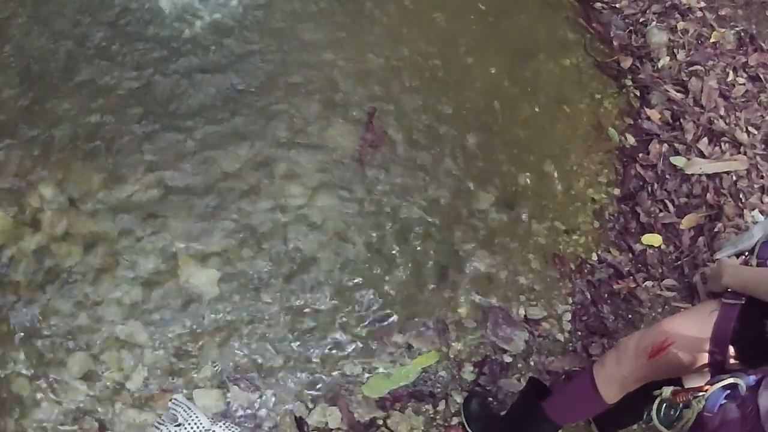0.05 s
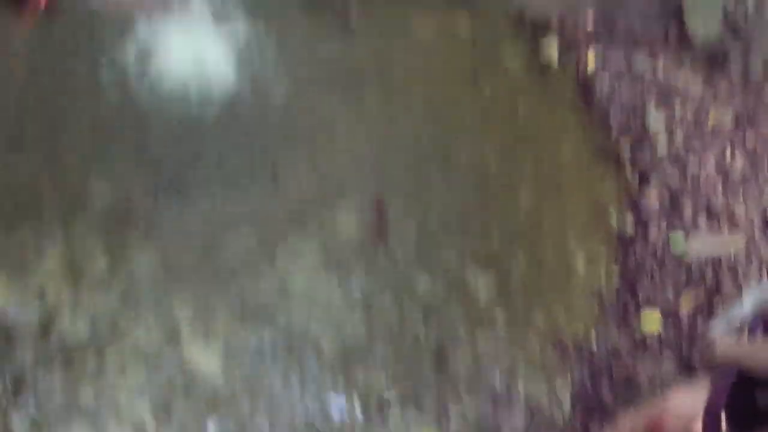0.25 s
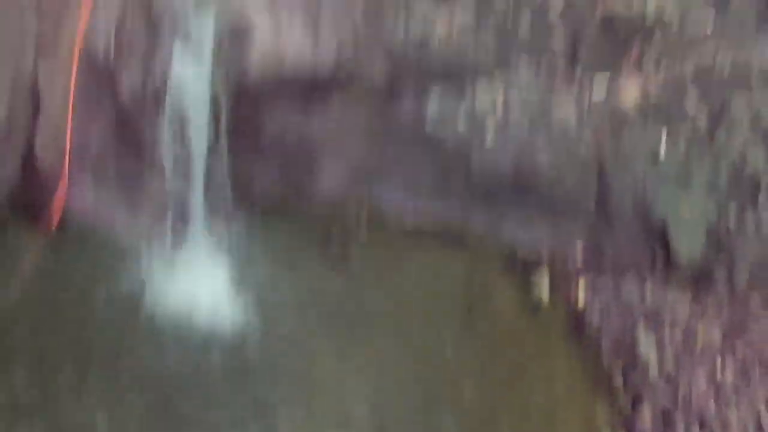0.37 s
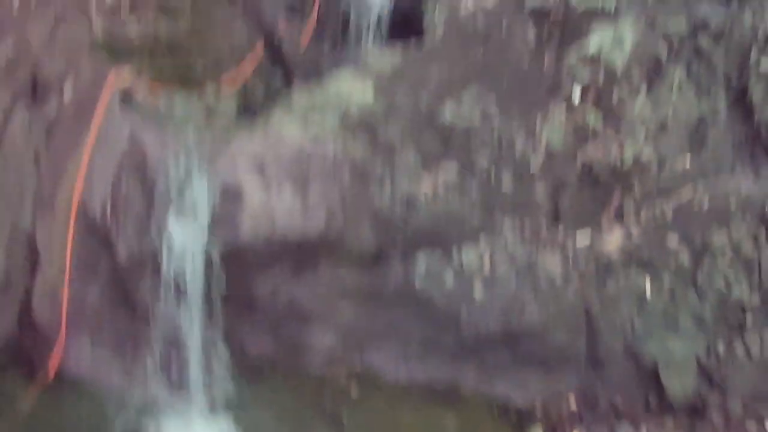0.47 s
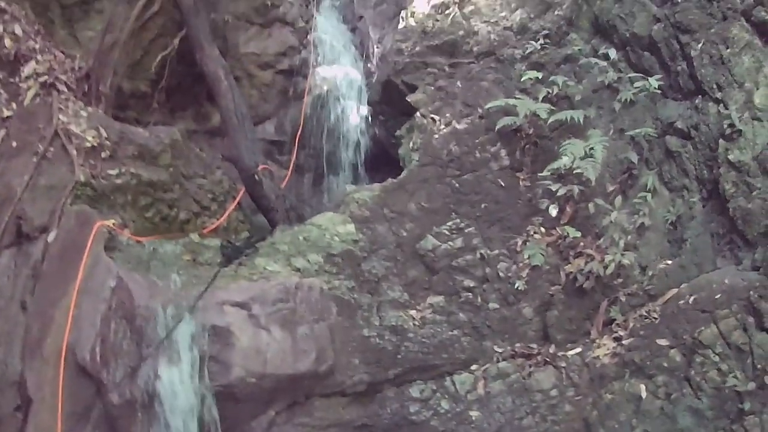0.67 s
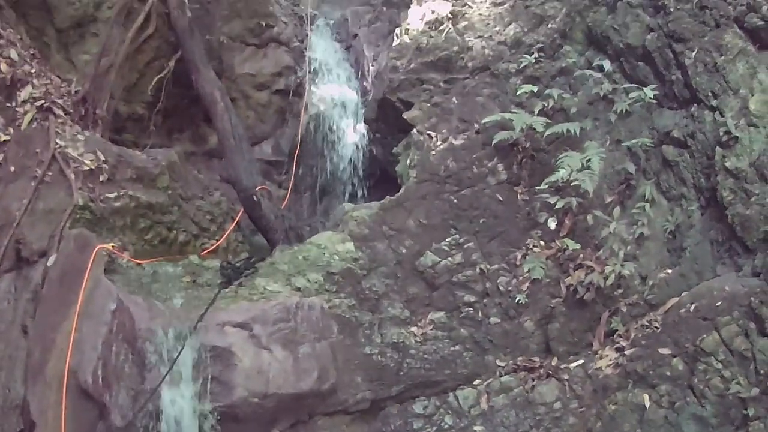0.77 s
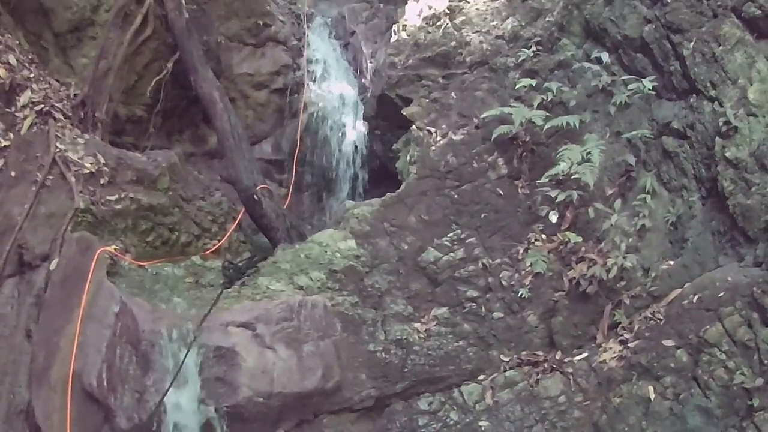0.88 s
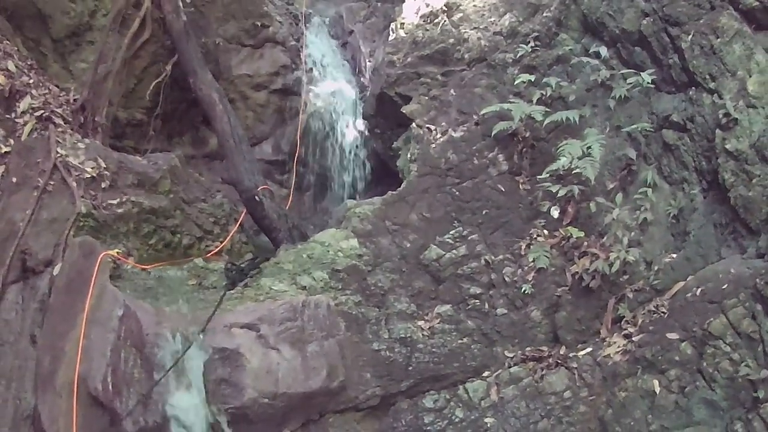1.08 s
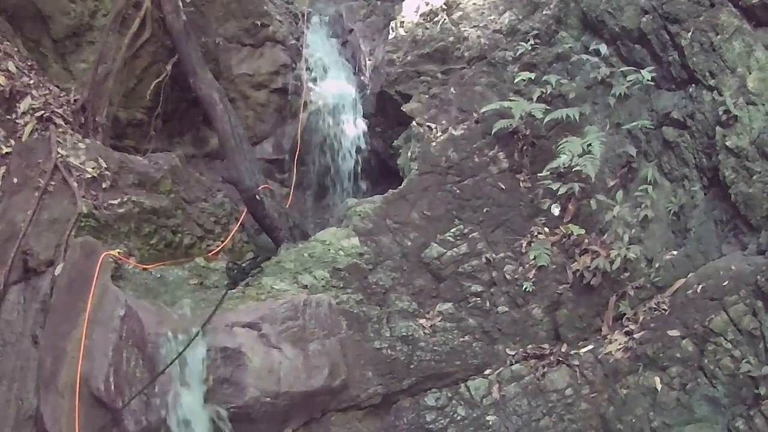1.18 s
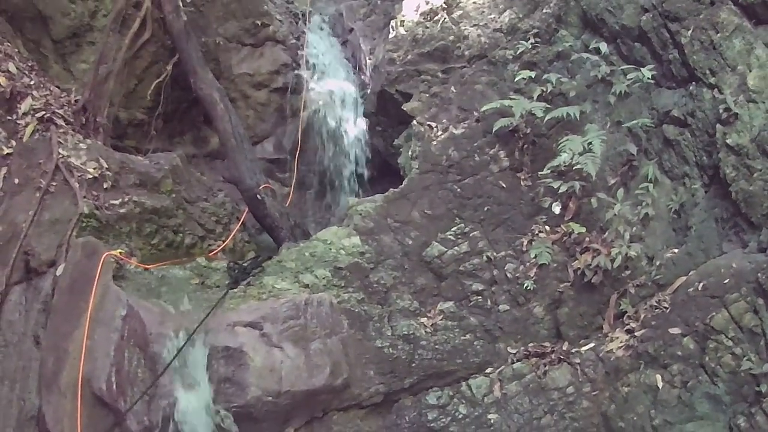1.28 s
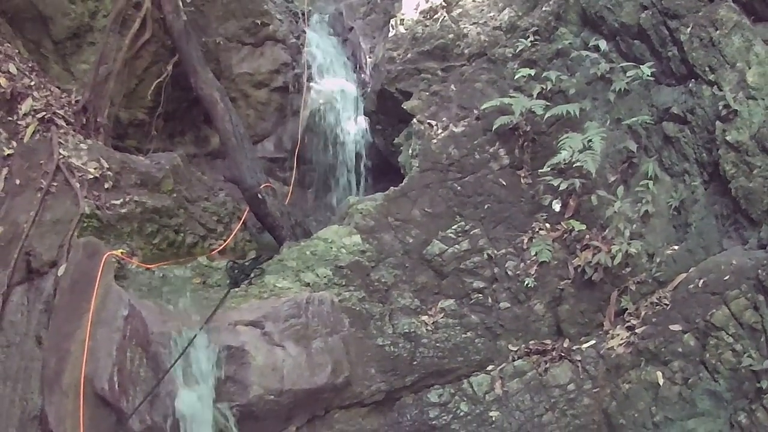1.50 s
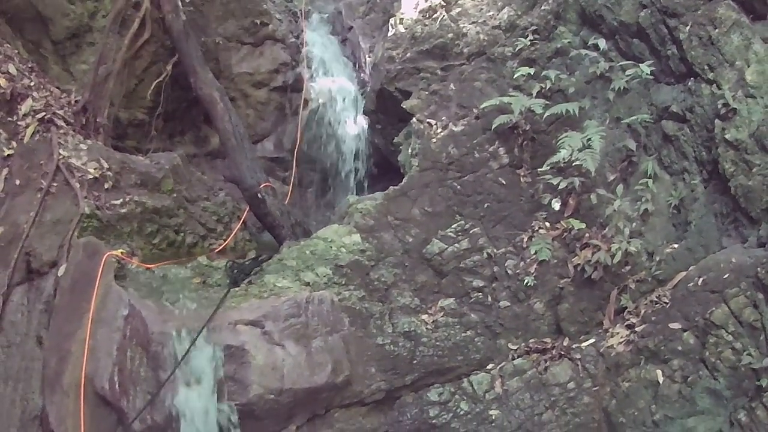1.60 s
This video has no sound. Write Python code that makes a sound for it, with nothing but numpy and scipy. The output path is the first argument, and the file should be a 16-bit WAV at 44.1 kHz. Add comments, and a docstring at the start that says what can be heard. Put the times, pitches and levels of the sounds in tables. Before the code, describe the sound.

Steady waterfall rush with fine splashing, a low microphone gust and soft handling bumps

```python
"""At a rock pool below a small waterfall, a body-worn camera's microphone hears the rush through its housing.
From the start, noise is the wash, ringing bubbles and bursts of spray the splashes; rock walls echo the wash.
Low noise is air on the microphone, with a deep gust as the camera swings up; sines that swell and fade
shudder the mount. As the swing stops the mount rubs, a low noise, and a slow damped push jolts the housing.
Light air and the fall carry on, and near the end the housing takes one soft, quicker bump."""
import sys
import numpy as np
from scipy import signal
from scipy.fft import rfft, irfft
from scipy.io import wavfile
from scipy.ndimage import uniform_filter1d

SR = 44100
rng = np.random.default_rng(int(sys.argv[2]) if len(sys.argv) > 2 else 0)


def digitize_waveform(pressure):
    """Quantize a signal to 16-bit integers and store it at the path in sys.argv[1].

    Rows of a 2-D input are taken as channels; values are limited to [-1, 1].
    """
    field = np.atleast_2d(pressure).T
    bounded = np.clip(field, -1, 1)
    quanta = np.round(bounded * 32767).astype(np.int16)
    wavfile.write(sys.argv[1], SR, quanta)


N = 72765  # samples

# Spectrum of the rush at the microphone, inside the housing: pitch_hz, relative level_db per Hz
RUSH_SPECTRUM = [(60, -0.5), (150, -10), (200, -11), (236, -7), (300, -11.5), (390, -10), (480, -13.5),
                 (680, -9.5), (860, -11), (1050, -3), (1170, -3.5), (1265, 2), (1340, -3), (1420, -9),
                 (1560, -12), (1870, -5), (2150, -11), (2560, -18.5), (2900, -32), (3150, -15), (3420, -13),
                 (3950, -22.5), (4200, -22), (5400, -23.5), (5750, -21.5), (6130, -18.5), (6500, -24),
                 (6850, -19.5), (7600, -27), (8400, -32.5), (8850, -42.5), (9800, -38), (10400, -46.5),
                 (11200, -39.5), (12200, -47), (15600, -46)]
# Narrow dips and peaks of the housing: pitch_hz, width_hz, level_db
HOUSING_NOTCHES = [(3020, 100, -3.5), (5140, 78, -2.5), (5430, 73, 1.5), (5820, 150, -8.5)]
# Rush as the camera turns from pool to fall: time_s, body_db (low part), spray_db (high part)
FACING_LEVELS = [(0, 2, 2.5), (.2, 2, 2.5), (.45, 0.8, 2.6), (.95, 0.5, 1.75), (1.08, -0.5, 2.5),
                 (1.3, -0.27, 2.5), (1.65, 0, 2)]
# Heavier splashes that stand out: start_s, level_db (swell peak, before band shaping; wash at 0), centre_hz
HEAVY_SPLASHES = [(.018, 3, 1350), (.399, 4, 1480), (0.495, 0, 1520), (0.581, -1, 1500), (0.839, 7.5, 1840),
                  (0.899, -8, 1300), (1.343, -5, 1520), (1.451, 3, 1210), (1.469, 6, 6500)]
# Air buffeting the microphone: time_s, level_db
BUFFET_LEVELS = [(0, -50), (.035, -49), (.08, -37), (.125, -45.5), (.165, -21), (.225, -21.5), (.26, -7.5),
                 (.34, -10), (.385, -14), (.415, -23.5), (.45, -22), (.52, -30), (.59, -19.5), (.65, -29.5),
                 (.70, -36), (.77, -27.5), (.95, -33), (1.2, -29), (1.3, -41.5), (1.385, -30),
                 (1.44, -35.5), (1.54, -34.5), (1.61, -35.5)]
# Spectrum of air in a strong gust: pitch_hz, relative level_db per Hz
GUST_SPECTRUM = [(1, -10.5), (6, -3), (12, -0.5), (22, -10), (36, -26.5), (50, -32.5), (65, -54),
                 (100, -55), (200, -88), (400, -110)]
# Spectrum of light air: pitch_hz, relative level_db per Hz
DRAUGHT_SPECTRUM = [(1, -9.5), (6, -8), (12, 2), (25, -11.5), (40, -19.5), (65, -28.5), (100, -37),
                    (200, -59), (400, -86)]
# Shudders of the camera on its mount: middle_s, peak_db, length_s
MOUNT_SHUDDERS = [(.185, -21, 0.073), (0.324, -15.5, 0.059)]
# Rubbing of the mount: time_s, level_db
RUB_LEVELS = [(.38, -57), (.43, -44.5), (.46, -44), (.495, -44.5), (.525, -45.5), (.56, -50), (.68, -63)]
# Spectrum of the rub: pitch_hz, relative level_db per Hz
RUB_SPECTRUM = [(25, -9), (50, 7), (100, -6.5), (175, 1), (260, -24.5), (380, -2.5), (520, -15.5),
                (1200, -47)]
# Bumps on the housing, the slow one a jolt as the swing ends: start_s, peak_db, rise_s
HOUSING_BUMPS = [(.568, -17.5, 0.019), (1.479, -24, 0.0029)]

RUSH_DB = -41  # before the facing levels
PATCH_DB, SWELL_DB, SPRAY_FLICKER_DB = 1, -0.54, 1.13  # size of each random drift; its sign is immaterial
SPRAY_HZ = 3400  # body gives way to spray here
ECHO_DB, ECHO_LAST_S = -22, .03  # level of each wall echo; the latest delay
BUBBLES_PER_S, BUBBLE_SIZES = 2200, 36  # the rate is shared among the sizes
BUBBLE_DB, BUBBLE_SPREAD_DB = -10, 1.5  # wash at 0
BUBBLE_Q, BUBBLE_RISE = 19.5, 0.031  # resonance quality; fractional pitch rise per decay time
SPLASHES_PER_S, SPLASH_S = 370, 0.00086  # burst time to its peak
SPLASH_DB, SPLASH_SPREAD_DB = -11, 4  # wash at 0, before the low-pass
SPLASH_TOP_HZ = 7100
HEAVY_RISE_S, HEAVY_OCTAVES = 0.0055, .8
DRAUGHT_MAX_DB = -29.5  # air above this level is gust
EVEN_S = 0.064  # half-width of the window that evens a rumble
MOUNT_HZ = 33.2
BUMP_SOFTNESS, BUMP_TURNS = 1.12, .1  # rounding of the onset; rebound in cycles per rise time
EDGE_HZ, FADE_S = 15750, .004


def gain_of(db):
    """Turns decibels into gain."""
    return 10 ** (np.asarray(db) / 20)


def evened(x):
    """Scales to rms 1."""
    return x / np.sqrt(np.mean(x ** 2) + 1e-20)


def curve(points):
    """Reads a time table at every sample."""
    return np.interp(np.arange(N) / SR, *np.transpose(points))


def filtered(x, gain):
    """Applies a gain to each frequency."""
    return irfft(rfft(x) * gain, N)


def coloured(x, points):
    """Filters by a spectrum table, read on a log-frequency axis, and scales to rms 1."""
    table_hz, level_db = np.transpose(points)
    hz = np.fft.rfftfreq(N, 1 / SR)
    return evened(filtered(x, gain_of(np.interp(np.log(hz + 1), np.log(table_hz + 1), level_db))))


def rumble(points):
    """Makes noise of the given spectrum, its slow changes of strength evened out."""
    x = coloured(rng.standard_normal(N), points)
    window = signal.windows.hann(int(2 * EVEN_S * SR))
    power = signal.oaconvolve(abs(signal.hilbert(x)) ** 2, window / window.sum(), "same")
    return evened(x / np.sqrt(power + 0.054))  # the floor limits the boost of quiet moments


def drift(shape, size):
    """Smooths random values over frames and bins, at rms 1."""
    z = rng.standard_normal(shape)
    over_frames = uniform_filter1d(z, size[0], axis=0)
    return evened(uniform_filter1d(over_frames, size[1], axis=1))


def random_sizes(spread_db):
    """Draws event gains: most are small, a few large."""
    return gain_of(spread_db * np.minimum(rng.exponential(1, N), 4))


def wash_between_walls():
    """White-noise spray, with scattered early echoes off the rock walls that ripple its spectrum."""
    wash = rng.standard_normal(N)
    out = wash.copy()
    for late, sign in zip(rng.uniform(.1, 1, size=12), rng.choice([-1, 1], size=12)):
        out += sign * gain_of(ECHO_DB) * np.roll(wash, int(late * ECHO_LAST_S * SR))
    return evened(out)


def bubbles():
    """Bubbles of many sizes each ring as a decaying sine, rising slightly in pitch."""
    out = np.zeros(N)
    for hz in np.geomspace(500, 5000, num=BUBBLE_SIZES):
        decay_s = BUBBLE_Q / hz / np.pi
        u = np.arange(0, 6 * decay_s, 1 / SR) / decay_s
        envelope = (1 - np.exp(-10 * u)) * np.exp(-u)
        ring = envelope * np.sin(2 * np.pi * hz * decay_s * (u + BUBBLE_RISE * u ** 2 / 2))
        births = (rng.random(N) < BUBBLES_PER_S / BUBBLE_SIZES / SR) * rng.choice([-1, 1], N)
        train = births * random_sizes(BUBBLE_SPREAD_DB)
        out += np.sqrt(hz) * evened(signal.oaconvolve(train, ring)[:N])
    return evened(out)


def splashes():
    """Lumps of water slap the pool, each a brief burst of low-passed noise."""
    hits = (rng.random(N) < SPLASHES_PER_S / SR) * random_sizes(SPLASH_SPREAD_DB)
    u = np.arange(SR // 10) / SR / SPLASH_S
    power = signal.oaconvolve(hits ** 2, (u * np.exp(-u)) ** 2)[:N]  # overlapping bursts add in power
    low_pass = signal.butter(3, SPLASH_TOP_HZ, fs=SR, output="sos")
    return evened(np.sqrt(abs(power))) * signal.sosfilt(low_pass, rng.standard_normal(N))


def heavy_splashes():
    """Heavier lumps of water: a quick swell of noise in a broad band, dying away."""
    out, f = np.zeros(N), np.fft.rfftfreq(N, 1 / SR)
    for start, db, hz in HEAVY_SPLASHES:
        u = np.maximum(np.arange(N) / SR - start, 0) / HEAVY_RISE_S
        band = np.exp(-(np.log2((f + 1) / hz) / HEAVY_OCTAVES) ** 2)
        out += gain_of(db) * u * np.exp(1 - u) * filtered(rng.standard_normal(N), band)
    return out


def through_housing(water):
    """The housing dips and lifts narrow bands and shapes the rush's spectrum, at rms 1."""
    f = np.fft.rfftfreq(N, 1 / SR)
    narrow_db = sum(db * np.exp(-((f - hz) / width) ** 2) for hz, width, db in HOUSING_NOTCHES)
    return coloured(filtered(water, gain_of(narrow_db)), RUSH_SPECTRUM)


def turned_and_swelling(water):
    """Body and spray change as the camera turns, with patchy, swelling and flickering levels."""
    hz, t, z = signal.stft(water, SR, nperseg=512, noverlap=384)
    z = z.T  # frames by bins
    spray = hz ** 4 / (hz ** 4 + SPRAY_HZ ** 4)
    s, body_db, spray_db = np.transpose(FACING_LEVELS)
    level_db = np.outer(np.interp(t, s, body_db), 1 - spray)
    level_db += np.outer(np.interp(t, s, spray_db), spray)
    level_db += PATCH_DB * drift(z.shape, size=(14, 5))
    level_db += SWELL_DB * drift((len(t), 1), size=(30, 1))
    level_db += SPRAY_FLICKER_DB * spray * drift((len(t), 1), size=(9, 1))
    return signal.istft((z * gain_of(level_db)).T, nperseg=512, noverlap=384)[1][:N]


def waterfall():
    """Wash, bubbles and splashes add up in the pool and reach the microphone through the housing."""
    water = wash_between_walls() + gain_of(BUBBLE_DB) * bubbles()
    water += gain_of(SPLASH_DB) * splashes() + heavy_splashes()
    return gain_of(RUSH_DB) * turned_and_swelling(through_housing(water))


def buffeting():
    """Light air flutters on the microphone as low noise; stronger air adds a deep gust."""
    push = gain_of(curve(BUFFET_LEVELS))
    light = np.minimum(push, gain_of(DRAUGHT_MAX_DB))
    gust = uniform_filter1d(push - light, size=600)
    return light * rumble(DRAUGHT_SPECTRUM) + gust * rumble(GUST_SPECTRUM)


def shudders():
    """The swing shakes the camera on its mount, which wobbles as a sine that swells and fades."""
    out = np.zeros(N)
    for middle, db, length in MOUNT_SHUDDERS:
        t = np.arange(N) / SR - middle
        swell = np.exp(-(2 * t / length) ** 2)
        out += gain_of(db) * swell * np.sin(2 * np.pi * (MOUNT_HZ * t + rng.random()))
    return out


def mount_rub():
    """The mount rubs as the swing stops: low noise that swells and fades."""
    return gain_of(curve(RUB_LEVELS)) * rumble(RUB_SPECTRUM)


def bumps():
    """Each bump on the housing gives one heavily damped low push."""
    out = np.zeros(N)
    for start, db, rise in HOUSING_BUMPS:
        u = np.maximum(np.arange(N) / SR - start, 0) / rise
        push = u ** BUMP_SOFTNESS * np.exp(-u) * np.cos(2 * np.pi * BUMP_TURNS * u)
        out -= gain_of(db) * push / abs(push).max()
    return out


def scene():
    """The waterfall, with air and handling on the microphone, as one channel."""
    return (waterfall() + buffeting() + shudders() + mount_rub() + bumps())[None]


def record(dry):
    """A short fade at each end avoids a click; a low-pass limits the band."""
    t = np.arange(N) / SR
    fade = np.clip(np.minimum(t, t[-1] - t) / FADE_S, 0, 1)
    low_pass = signal.firwin(511, EDGE_HZ, window=("kaiser", 9), fs=SR)
    return signal.oaconvolve(dry * fade, low_pass[None], "same")


dry = scene()
out = record(dry)
digitize_waveform(out)
```